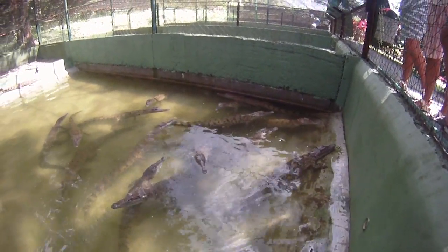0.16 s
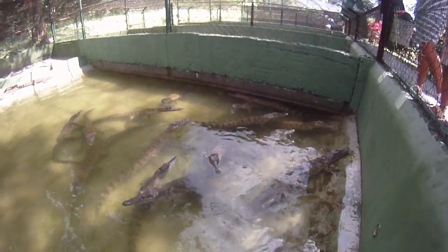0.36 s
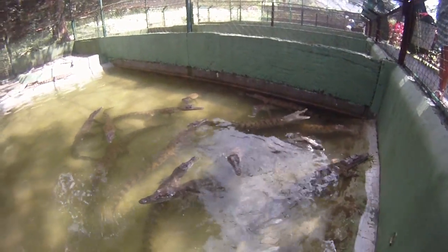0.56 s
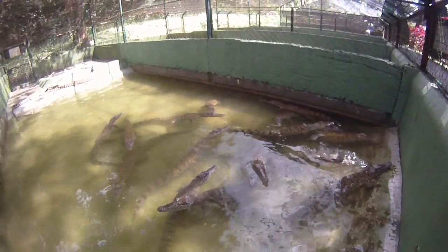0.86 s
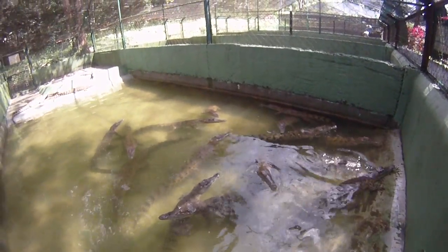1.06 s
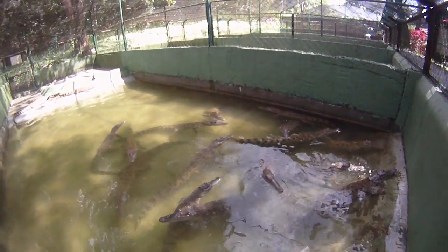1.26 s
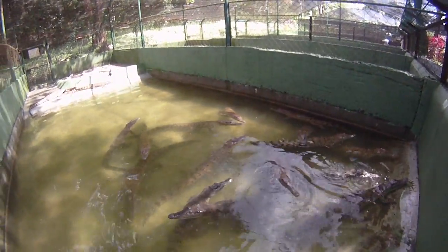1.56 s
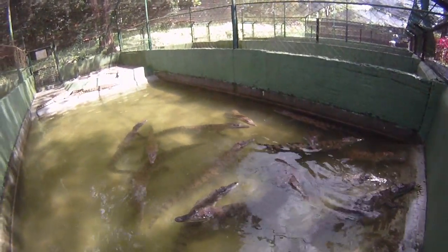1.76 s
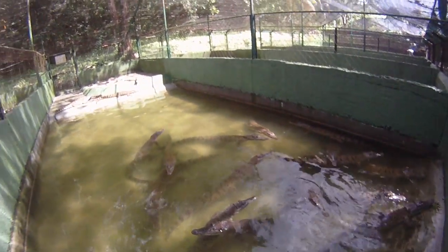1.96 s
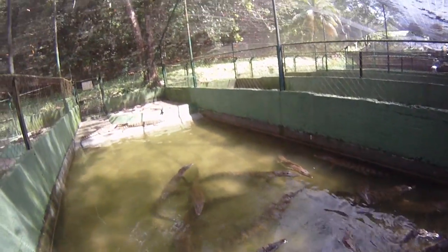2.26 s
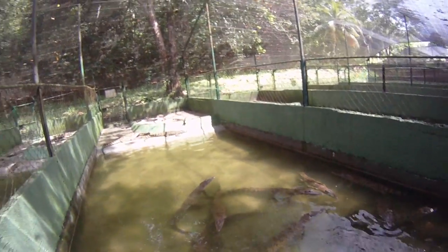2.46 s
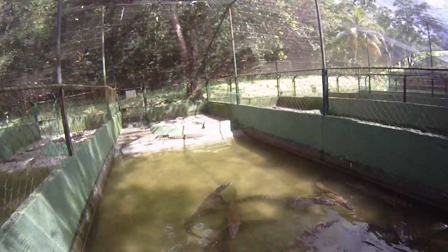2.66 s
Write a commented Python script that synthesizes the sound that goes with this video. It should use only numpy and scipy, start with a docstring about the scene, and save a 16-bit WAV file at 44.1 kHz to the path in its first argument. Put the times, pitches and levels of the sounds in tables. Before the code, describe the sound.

A knock against a hand-held camera gives a hard double clack and a low thump, right at the microphone. Low handling rumble continues over steady outdoor hiss and a thin insect-like buzz, with two faint taps near the end.

```python
"""One knock against a hand-held camera: a hard double clack of its casing and a low thump of its mount.
The hand keeps the mount rumbling, and two faint taps come near the end.
Behind this, beside a crocodile pool, are a steady outdoor hiss and a thin insect-like buzz.
The recorder holds each sample at a low rate, which mirrors everything into the treble."""
import sys
import numpy as np
from scipy.fft import rfft, irfft, next_fast_len
from scipy.io import wavfile
from scipy.ndimage import map_coordinates

SR = 44100
rng = np.random.default_rng(int(sys.argv[2]) if len(sys.argv) > 2 else 0)


def int16_out(signal):
    """Quantize to a 16-bit WAV file."""
    q = np.round(np.clip(np.atleast_2d(signal).T, -1, 1) * 32767)
    wavfile.write(sys.argv[1], SR, q.astype(np.int16))


N = 123479

# The quick contacts that make up the knock: start_s, level_db, brightness_db_per_octave
CONTACTS = [(0.2423, -21.5, -0.5), (.2466, -36, -3), (0.2664, -29, -7.5), (0.2707, -30.5, 5.5)]
# The tones of the struck casing: pitch_hz, relative_db, fade_s (time to fall by 60 dB)
CASING_TONES = [(720, -18, .06), (905, -13, .06), (1130, -9, .045), (1290, -6, .04), (1560, -11, .035),
                (1755, -3, .03), (1965, -3, .028), (2110, -5, .028), (2330, -16, .045), (2520, -18, .045),
                (2765, -16, .035), (3570, -30, .03)]
# The tone colour of a contact's crack: pitch_hz, relative_db
CRACK_COLOUR = [(300, -48), (620, -31), (850, -11), (1250, 6.5), (1500, -0.5), (2000, 3.5), (2400, -6),
                (3000, -15.5), (4000, -25), (5900, -30)]
# Shoves that set the mount ringing: start_s, level_db
SHOVES = [(0.2439, -29), (0.2606, -29), (2.46, -53.5)]
# The low tones of the mount: pitch_hz, relative_db, fade_s
MOUNT_TONES = [(59.86, -3.5, 0.71), (170.8, 1, 0.29), (234.2, -0.5, 0.32)]
# How loud the hand's rumble is: time_s, level_db
RUMBLE_LEVEL = [(0, -46.5), (.6, -46.5), (.85, -46), (1.1, -55.5), (1.42, -42), (1.62, -51.5), (1.9, -48),
                (2.25, -44.5), (2.55, -43.5), (2.8, -45.5)]
# The tone colour of the rumble: pitch_hz, relative_db
RUMBLE_COLOUR = [(12, -28), (24, -7.5), (32, -2.5), (45, -3), (58, 5.5), (66, -6.5), (80, -19.5),
                 (120, -24), (300, -58)]
# Faint taps: peak_s, level_db, pitch_hz, length_s
TAPS = [(2.478, -59, 960, .024), (2.592, -57, 2100, .024)]
# How the outdoor hiss rises and falls: time_s, relative_db
HISS_LEVEL = [(0, -56.5), (.5, -54.5), (.98, -54), (1.6, -54), (2.05, -53.5), (2.34, -55.5), (2.8, -56.5)]
# The tone colour of the hiss: pitch_hz, relative_db
HISS_COLOUR = [(40, 12.5), (130, 4), (220, 1.5), (320, -1.5), (400, -4.5), (700, -7), (950, -4), (1300, 0),
               (1750, -3.5), (2000, 1.5), (2450, 0), (2750, -9), (3200, -8.5), (3900, -15.5), (5000, -15),
               (5900, -12)]
# Narrow ringing bands in the hiss: pitch_hz, width_hz, base_db, peak_s, length_s, rise_db
HISS_RINGS = [(1137, 107, -67, 0.945, 0.33, 10.5), (1184, 130, -69.5, 1.86, 0.89, 7.5),
              (1546, 124, -67.5, 1.8, 1.6, 5.5), (2400, 270, -66, 0.77, 1.8, 3.5),
              (331.6, 18, -83.5, 2.28, 0.61, 15.5)]
# How the whole buzz rises and falls: time_s, relative_db
BUZZ_LEVEL = [(0, -61), (.6, -65), (1, -63), (2.1, -63.5), (2.45, -63), (2.8, -63.5)]
# The tone colour of the noise in the buzz: pitch_hz, relative_db
BUZZ_COLOUR = [(4000, -50), (5120, -26), (5330, -3), (5600, 0), (5990, -1)]
# Shrill tones in the buzz: pitch_hz, relative_db, extra_db
BUZZ_TONES = [(5215, -24, 10), (5356, -15, 3), (5462, -16, 0), (5512, -5, -1), (5582, -13, 1),
              (5678, -14, 6), (5702, -14, 3), (5823, -14, 12)]
# How much of their extra_db the shrill tones get: time_s, share (0 to 1)
BUZZ_SWELL = [(0, 0), (1.9, 0), (2.4, 1), (2.8, .9)]
# The tone colour of each channel's own noise: pitch_hz, relative_db
CHANNEL_COLOUR = [(30, -15), (200, 3), (500, 13), (1200, -9), (2000, -22.5), (3000, 7), (4500, 12.5),
                  (5600, -7), (5990, -5)]

CONTACT_RISE_S, TILT_PIVOT_HZ, CASING_DB = 0.00034, 1500, -4
CRACK_DB, CRACK_FADE_S = -8, .02
ECHO_DB, ECHO_FADE_S = -19.5, 0.28
MOUNT_RISE_S, MOUNT_HUM_DB = 0.0051, -71
HISS_BOOST_DB, RING_WAVER_DB = 1.5, 2
BUZZ_NOISE_DB, BUZZ_DRIFT_HZ, BUZZ_FLUTTER_DB = 8.5, 5.09, 1.5
CHANNEL_NOISE_DB, HOLD_HZ, TOP_HZ = -77.5, 12000, 15350


def clack():
    """Each contact rings the casing, makes a sharp crack and leaves a short echo."""
    onset = 1 - np.exp(-(np.arange(N) / SR / CONTACT_RISE_S) ** 2)
    out = np.zeros(N)
    for start_s, db, tilt in CONTACTS:
        # The tilt makes this contact brighter or duller.
        tones = [(hz, level + tilt * np.log2(hz / TILT_PIVOT_HZ), fade_s)
                 for hz, level, fade_s in CASING_TONES]
        colour = [(hz, level + tilt * np.log2(hz / TILT_PIVOT_HZ)) for hz, level in CRACK_COLOUR]
        crack = noise(colour) * (gain(CRACK_DB) * fade(CRACK_FADE_S) + gain(ECHO_DB) * fade(ECHO_FADE_S))
        # Neighbouring tones swing opposite ways.
        casing = ring(tones[::2], scatter_db=.5) - ring(tones[1::2], scatter_db=2.0)
        out += delayed(gain(db) * onset * (gain(CASING_DB) * casing + crack), start_s)
    return out


def thump():
    """Each shove shakes the mount, whose three low tones ring on."""
    onset = 1 - np.exp(-np.arange(N) / SR / MOUNT_RISE_S)
    return sum(delayed(gain(db) * onset * ring(MOUNT_TONES, scatter_db=2.4), start_s)
               for start_s, db in SHOVES)


def hand_rumble():
    """The hand keeps the mount rumbling and makes its second tone hum faintly."""
    rumble = gain(curve(RUMBLE_LEVEL)) * noise(RUMBLE_COLOUR)
    hum = gain(MOUNT_HUM_DB) * narrow_noise(MOUNT_TONES[1][0], width_hz=26)
    return rumble + hum


def taps():
    """Soft, short, pitched blips that barely stand out from the hiss."""
    return sum(gain(db) * swell(peak_s, length_s) * narrow_noise(hz, width_hz=170)
               for peak_s, db, hz, length_s in TAPS)


def hiss():
    """Steady outdoor hiss in which a few ringing bands swell and waver."""
    rings = np.zeros(N)
    for hz, width_hz, base_db, peak_s, length_s, rise_db in HISS_RINGS:
        ring_db = base_db + rise_db * swell(peak_s, length_s) + RING_WAVER_DB * wobble(per_s=4.63)
        rings += gain(ring_db) * narrow_noise(hz, width_hz)
    hiss_db = curve(HISS_LEVEL) + HISS_BOOST_DB + .3 * wobble(per_s=8.94)
    return gain(hiss_db) * noise(HISS_COLOUR) + rings


def buzz():
    """A thin high buzz, like insects: shrill tones drift and flutter in a band of noise."""
    share = curve(BUZZ_SWELL)
    tones = np.zeros(N)
    for hz, db, extra_db in BUZZ_TONES:
        tone_db = db + extra_db * share + BUZZ_FLUTTER_DB * wobble(per_s=20)
        pitch_hz = hz + BUZZ_DRIFT_HZ * wobble(per_s=20)
        tones += gain(tone_db) * normalise(np.sin(2 * np.pi * np.cumsum(pitch_hz) / SR))
    return gain(curve(BUZZ_LEVEL)) * (tones + gain(BUZZ_NOISE_DB) * noise(BUZZ_COLOUR))


def gain(db):
    """Turn decibels into a number to multiply by."""
    return 10 ** (np.asarray(db) / 20)


def normalise(x):
    """Scale a signal to an average strength (rms) of 1."""
    return x / np.sqrt(np.mean(x ** 2) + 1e-20)


def curve(points):
    """Join (time_s, value) points with straight lines, giving one value per sample."""
    return np.interp(np.arange(N) / SR, *np.transpose(points))


def wobble(per_s):
    """A smooth curve through per_s random values each second."""
    return map_coordinates(rng.standard_normal(N // 100), [np.arange(N) * per_s / SR], mode="mirror")


def swell(peak_s, length_s):
    """A bell-shaped rise and fall around peak_s."""
    return np.exp(-(2 * (np.arange(N) / SR - peak_s) / length_s) ** 2)


def fade(fade_s):
    """Die away by 60 dB every fade_s seconds."""
    return np.exp(-np.log(1000) * np.arange(N) / SR / fade_s)


def ring(tones, scatter_db):
    """Fading tones, each a little stronger or weaker from blow to blow."""
    t = np.arange(N) / SR
    return sum(gain(db + scatter_db * rng.normal()) * fade(fade_s) * np.sin(2 * np.pi * hz * t)
               for hz, db, fade_s in tones)


def delayed(x, start_s):
    """Make a sound begin at start_s."""
    return np.pad(x, (round(start_s * SR), 0))[:N]


def filtered(x, response):
    """Turn each frequency f in a sound up or down by response(f)."""
    size = next_fast_len(N + SR // 2)
    return irfft(rfft(x, size) * response(np.fft.rfftfreq(size, 1 / SR)), size)[:N]


def noise(colour):
    """Noise of strength 1, shaped by (pitch_hz, relative_db) points."""
    hz, db = np.transpose(colour)
    response = lambda f: gain(np.interp(np.log(f + 1), np.log(hz + 1), db))
    return normalise(filtered(rng.standard_normal(N), response))


def narrow_noise(hz, width_hz):
    """Noise of strength 1, gathered closely around one pitch."""
    return normalise(filtered(rng.standard_normal(N), lambda f: 1 / (1 + ((f - hz) / width_hz * 2) ** 2)))


def scene():
    """One microphone feeds both channels; each adds a trace of its own noise."""
    mono = clack() + thump() + taps() + hand_rumble() + hiss() + buzz()
    return np.array([mono + gain(CHANNEL_NOISE_DB) * noise(CHANNEL_COLOUR) for _ in range(2)])


def record(dry):
    """Holding each sample mirrors the sound below half of HOLD_HZ into the treble, up to TOP_HZ."""
    low_bands = [filtered(x, lambda f: f < HOLD_HZ / 2) for x in dry]
    mirror = 1 + 2 * np.cos(2 * np.pi * HOLD_HZ * np.arange(N) / SR)
    soften_treble = lambda f: np.sinc(f / HOLD_HZ) * (f < TOP_HZ)
    return np.array([filtered(x * mirror, soften_treble) for x in low_bands])


dry = scene()
out = record(dry)
int16_out(out)
```